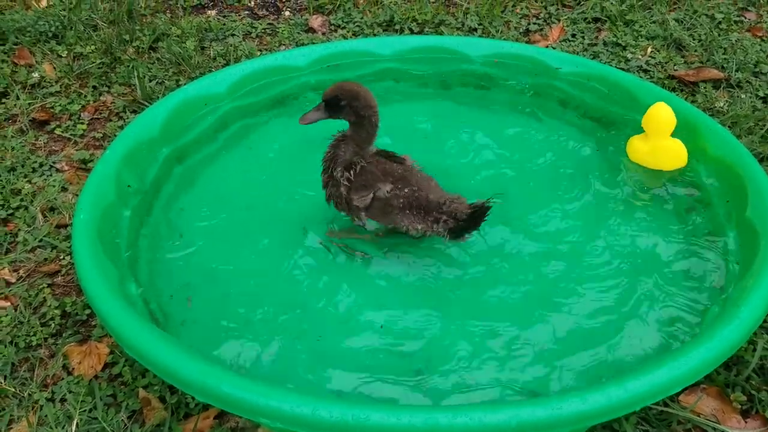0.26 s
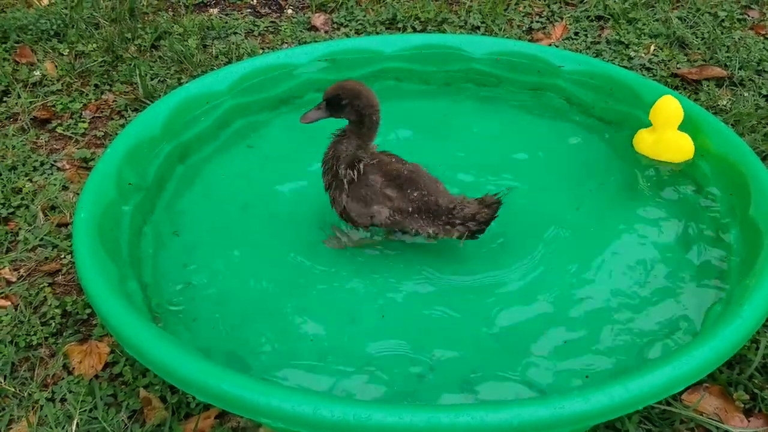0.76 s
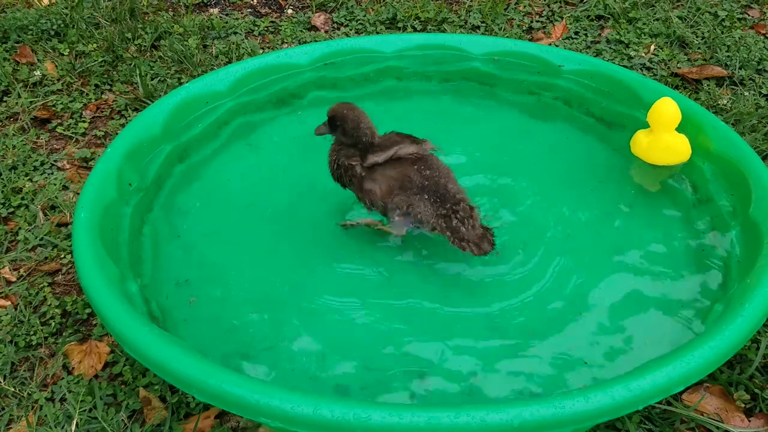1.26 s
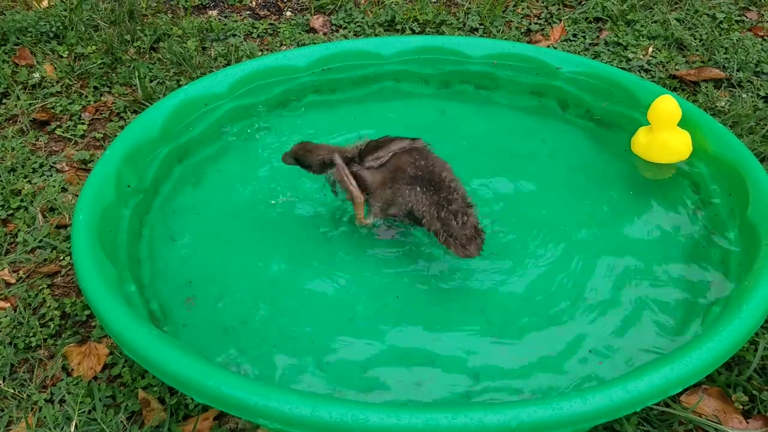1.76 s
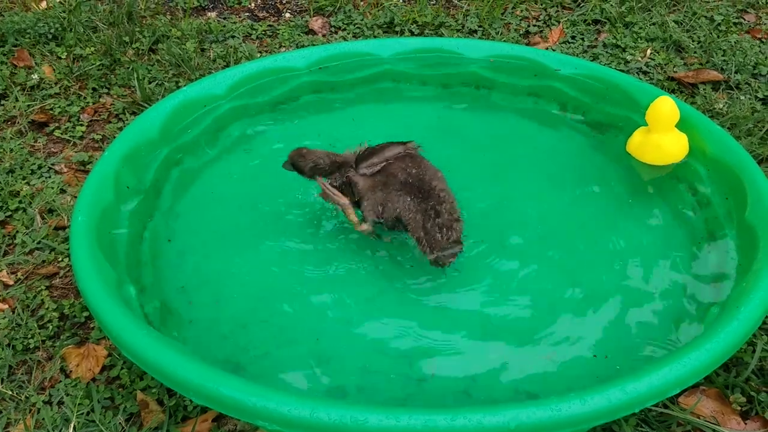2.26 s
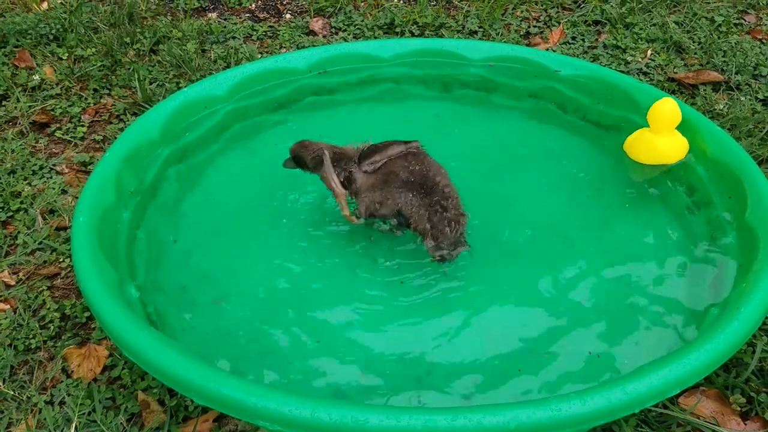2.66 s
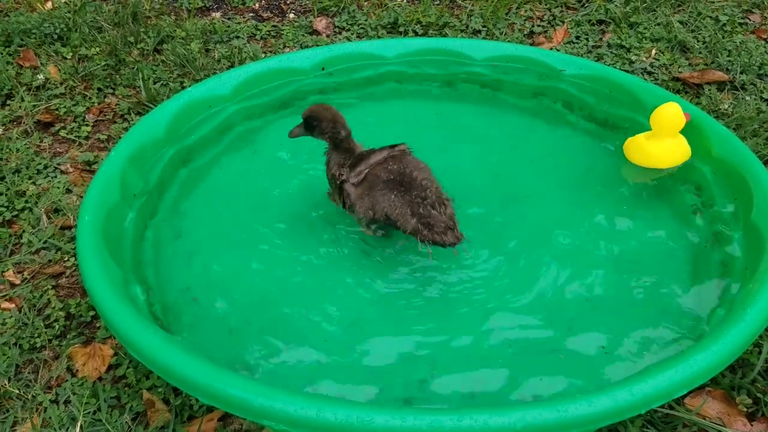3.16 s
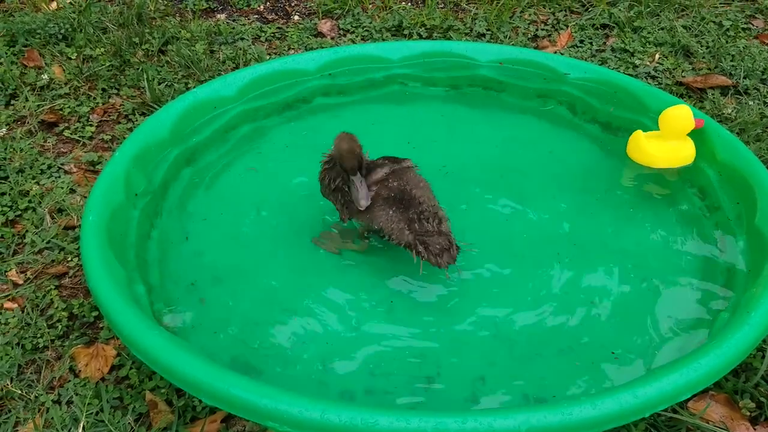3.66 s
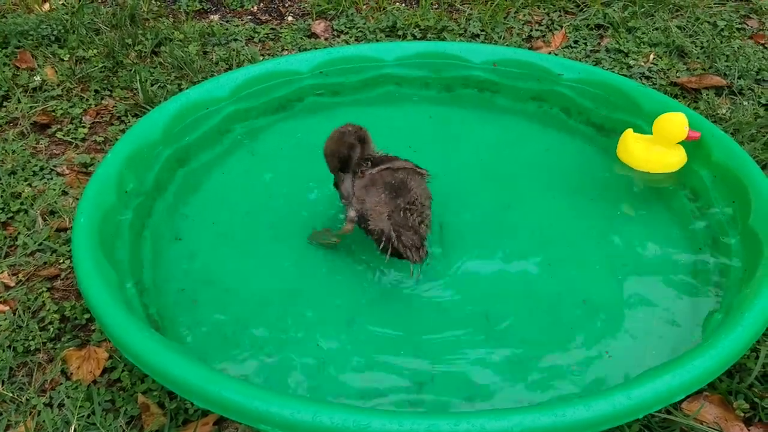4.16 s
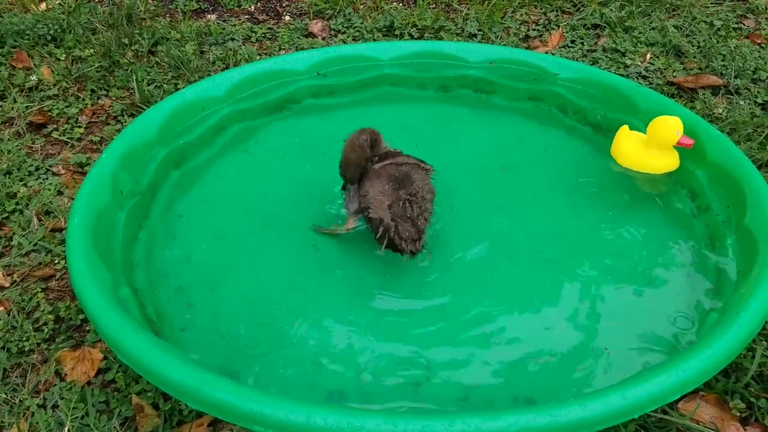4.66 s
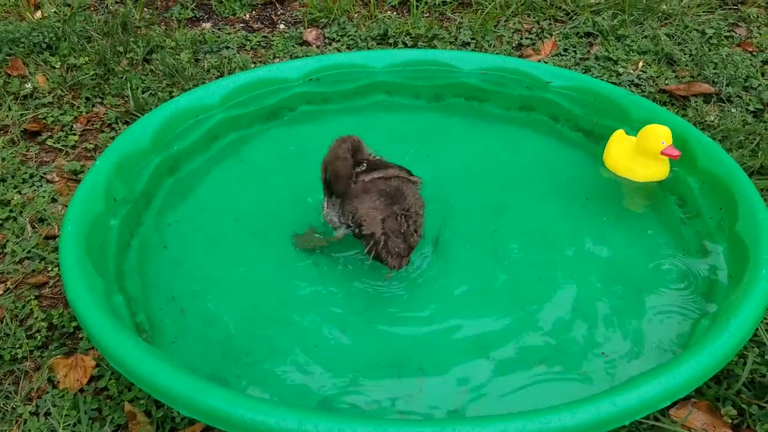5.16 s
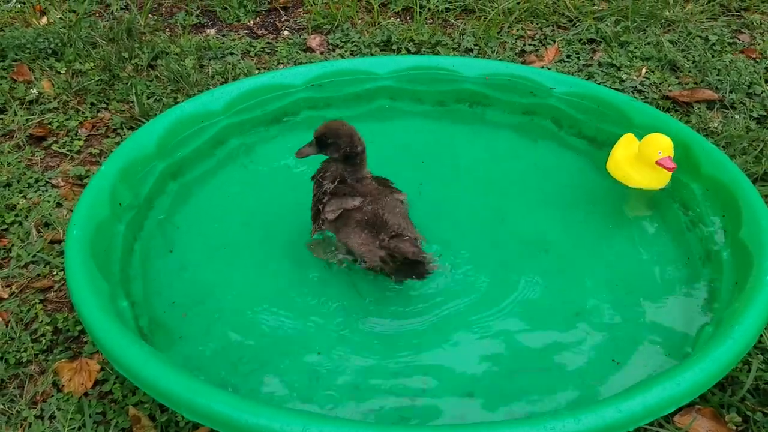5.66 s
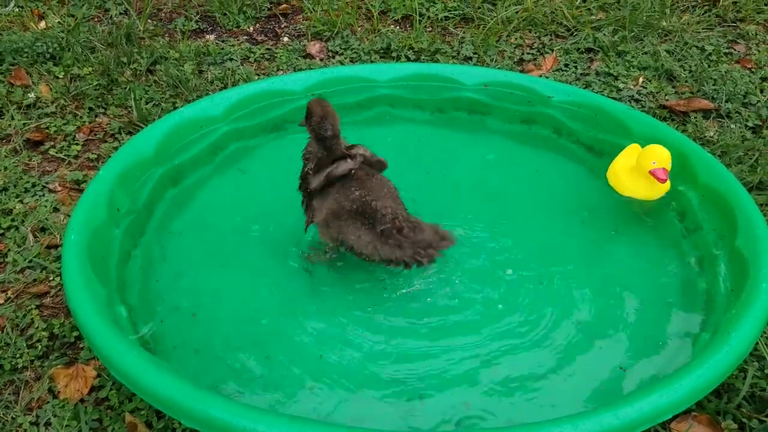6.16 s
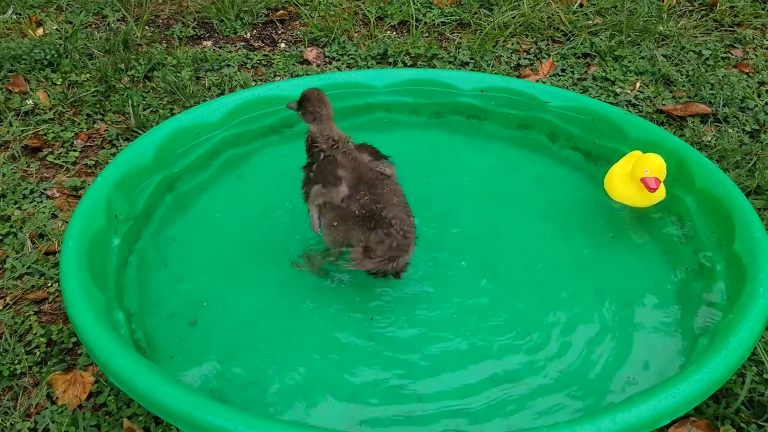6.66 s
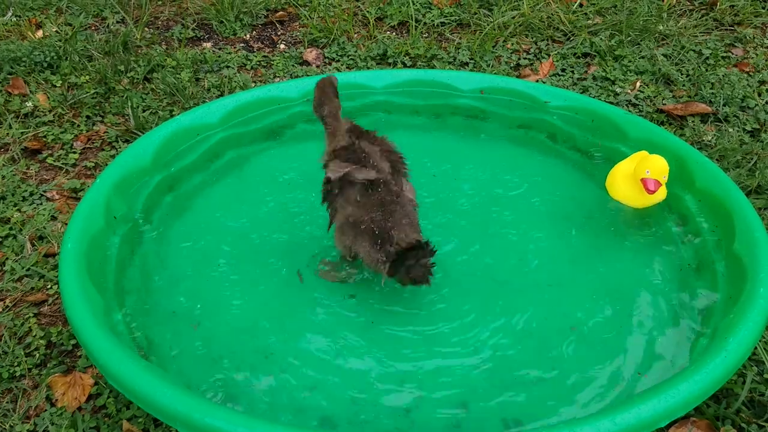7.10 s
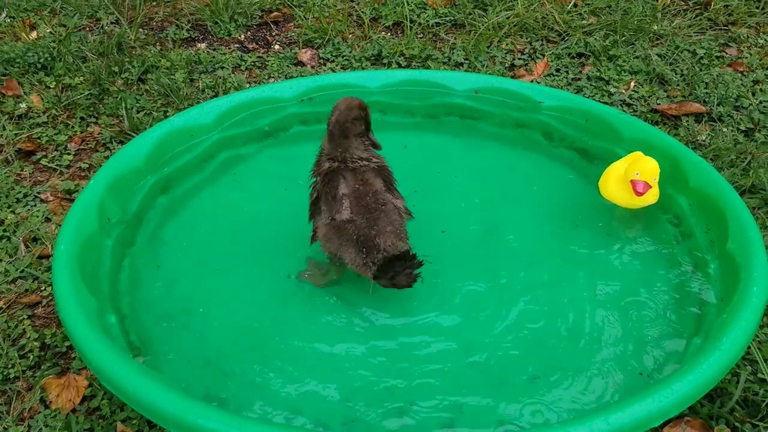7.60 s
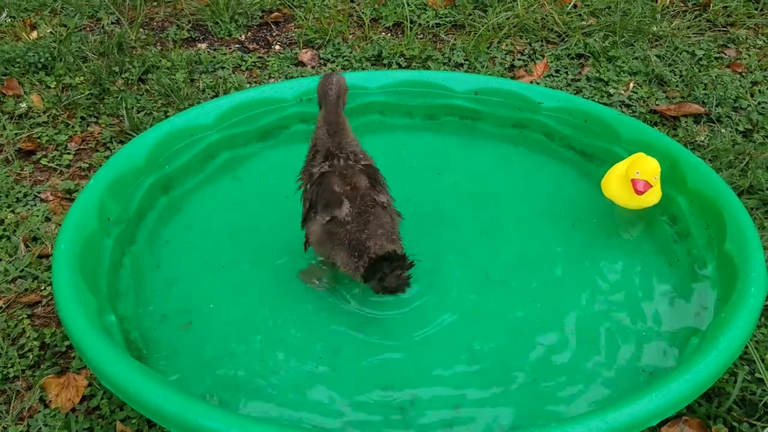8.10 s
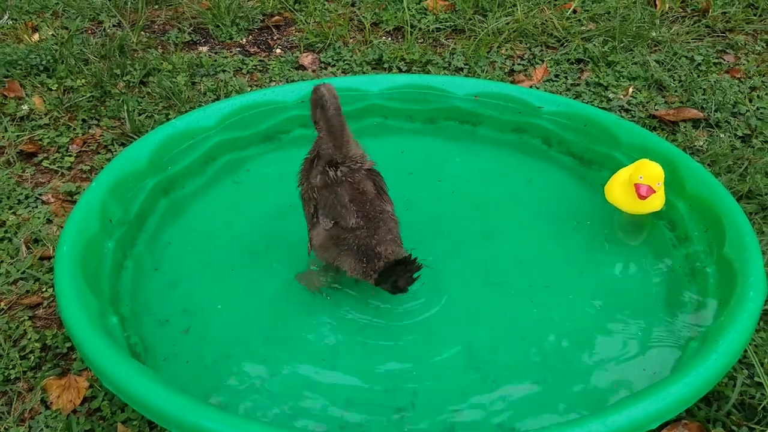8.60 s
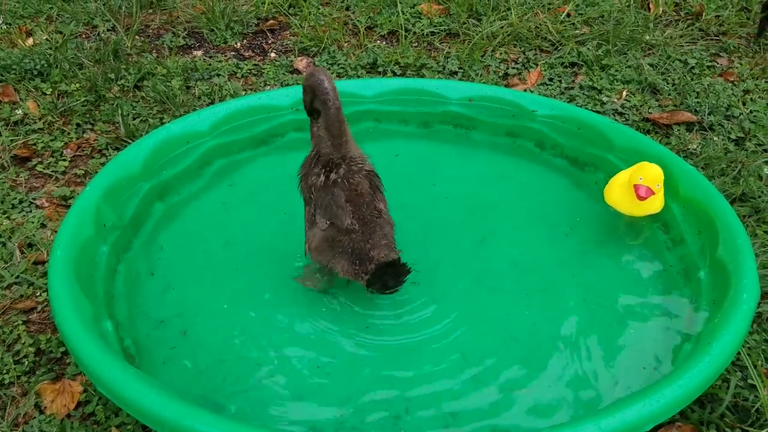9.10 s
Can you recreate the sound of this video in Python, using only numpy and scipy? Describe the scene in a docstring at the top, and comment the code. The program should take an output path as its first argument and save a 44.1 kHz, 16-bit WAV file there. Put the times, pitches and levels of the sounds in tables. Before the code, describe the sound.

Quiet outdoor air with a faint low hum, then a small plop and a busy flurry of light slaps, spray and bubbly droplets from a duckling in a wading pool. It calms to gentle lapping, scattered thin peeps, short throaty quacks and soft cooing whistles, with occasional drips to the end. The scene sits clearly on the left, dry and fairly close; dull rumble and handling thumps occupy the right.

```python
"""Peeps, soft coos and short low quacks of a young duck bathing in a shallow plastic pool on a lawn.
Peeps and coos are whistled tones; quacks are pulses and rasp ringing the throat.
Feet, bill and body slap, slosh and spray water, once with a rough plop; drops ring as bubbles.
Quiet outdoor air and a far hum lie under it.
The open left microphone port hears the scene; the muffled right one mostly rumbles and takes the hand's bumps."""
import sys
import numpy as np
from scipy import signal
from scipy.fft import rfft, irfft, next_fast_len
from scipy.io import wavfile
from scipy.ndimage import map_coordinates

SR = 44100
rng = np.random.default_rng(int(sys.argv[2]) if len(sys.argv) > 2 else 0)


def digitize_waveform(pressure):
    """Quantize a signal to 16-bit integers and store it at the path in sys.argv[1].

    Rows of a 2-D input are taken as channels; values are limited to [-1, 1].
    """
    field = np.atleast_2d(pressure).T
    bounded = np.clip(field, -1, 1)
    quanta = np.round(bounded * 32767).astype(np.int16)
    wavfile.write(sys.argv[1], SR, quanta)


N = 411889

# spectrum of water struck by foot, bill or drop: (frequency [Hz], gain [dB])
SMACK_SPECTRUM = [(300, -32), (1200, 1), (2200, 1.5), (4000, 0), (6000, -20), (12000, -36)]
# spectrum of fine spray: (frequency [Hz], gain [dB])
SPRAY_SPECTRUM = [(2000, -53), (5000, 5.5), (8000, -1.5), (10500, 1.5), (15500, 0.5)]
# strokes of foot or body: (time [s], time to die away [s], relative slosh level [dB], relative spray level [dB])
STROKE_EVENTS = [(1.315, 0.11, -71, -69), (1.388, 0.23, -65, -68), (1.445, 0.12, -81, -72),
                 (1.51, .3, -87, -72), (1.712, 0.22, -66.5, -73), (1.775, 0.052, -74, -70),
                 (1.845, 0.49, -82, -71.5), (2.11, 0.79, -75, -77), (2.495, 0.25, -66.5, -73),
                 (2.66, .3, -76, -81), (3.875, 0.28, -67, -74), (6.09, .3, -83, -76),
                 (6.19, 0.12, -78, -82), (8.26, .25, -74, -78), (9.085, 0.066, -71, -73),
                 (9.25, 0.22, -73, -75)]


def amp(db):
    """Decibels to gain."""
    return 10 ** (np.asarray(db) / 20)


def unit(x):
    """Scale to rms 1."""
    return x / np.sqrt(np.mean(x ** 2) + 1e-20)


def seconds(length_s):
    """Sample times of a sound of this length."""
    return np.arange(int(length_s * SR)) / SR


def add(track, time_s, sound):
    """Mix a sound into a track at a time, cut at the track's end."""
    start = min(max(round(time_s * SR), 0), len(track))
    track[start:start + len(sound)] += sound[:len(track) - start]


def wobble(rate_hz, size=N):
    """A smooth random curve through rate_hz random knots a second."""
    knots = rng.standard_normal(int(size * rate_hz / SR) + 4)
    return map_coordinates(knots, [np.arange(size) * rate_hz / SR])


def colour(x, points):
    """Causal minimum-phase filter with the gain of the (Hz, dB) points."""
    m = 2 * next_fast_len(len(x) // 2 + 4096)
    hz, db = np.transpose(points)
    gain = amp(np.interp(np.log(np.fft.rfftfreq(m, 1 / SR) + 1), np.log(hz), db))
    cepstrum = irfft(np.log(gain))[:m // 2]
    cepstrum[1:] *= 2  # fold to minimum phase
    return irfft(rfft(x, m) * np.exp(rfft(cepstrum, m)))[:len(x)]


def noise(points, size=N):
    """Coloured noise of rms 1."""
    return unit(colour(rng.standard_normal(size), points))


def resonate(x, hz, width_hz):
    """One resonance."""
    return signal.lfilter(*signal.iirpeak(hz, hz / width_hz, SR), x)


def bubble(hz, cycles, rise=0.041, attack_s=0.00036):
    """A trapped air bubble rings, its pitch rising at first as it nears the surface; cycles sets its decay."""
    t = seconds(min(.04, 7 * cycles / hz))
    age = t * hz / cycles  # in decay times
    ring = np.sin(2 * np.pi * hz * t * (1 + rise * np.minimum(age, 3) / 4))
    return ring * np.exp(-age) * (1 - np.exp(-t / attack_s))


def burst(points, t60_s, snap):
    """A sharp first contact and a fast-dying splatter, coloured; peak 1."""
    t = seconds(.05)
    hit = rng.standard_normal(len(t)) * amp(-60 * t / t60_s)
    hit[0] += snap
    hit = colour(hit, points)
    return hit / np.abs(hit).max()


def whistle(pitch_hz, rasp, waver=0.027, overtone_db=-22, flutter_db=2, flutter_hz=198, rasp_hz=1100):
    """One thin whistled note of rms 1 along a pitch curve; rasp 0-1 smears it into narrow noise."""
    size = len(pitch_hz)
    phase = 2 * np.pi * np.cumsum(pitch_hz * (1 + waver * wobble(500, size))) / SR
    clean = np.sin(phase) + amp(overtone_db) * np.sin(2 * phase)
    rough = wobble(rasp_hz, size) * np.sin(phase) + wobble(rasp_hz, size) * np.cos(phase)
    share = np.clip(rasp, 0, 1)
    swell = np.sqrt(np.sin(np.pi * (np.arange(size) / size) ** 0.65))
    flutter = amp(flutter_db * wobble(flutter_hz, size))
    return unit(swell * flutter * (np.sqrt(1 - share) * unit(clean) + np.sqrt(share) * unit(rough)))


def air(air_db=-55, hum_db=-58, hum_hz=124):
    """Quiet outdoor air, its level wandering, with the wavering hum of a far machine."""
    # outdoor air spectrum: (frequency [Hz], relative density [dB])
    air_spectrum = [(20, -6.5), (50, -18), (90, 0.5), (128, 0.5), (160, -2.5), (250, -7), (400, -16.5),
                    (800, -19.5), (1500, -21.5), (3000, -25.5), (5000, -37), (7500, -45), (15000, -55.5)]
    hum_phase = 2 * np.pi * np.cumsum(hum_hz + 3 * wobble(12)) / SR
    hum = np.sin(hum_phase) * amp(1.14 * wobble(5.4))
    wander_db = .7 * wobble(2.25) + 1.3 * wobble(9)
    return amp(air_db + wander_db) * noise(air_spectrum) + amp(hum_db) * unit(hum)


def rumble(level_db=-49.5, wander_db=1.33):
    """Low-heavy noise of the muffled port, its level wandering."""
    # muffled port spectrum: (frequency [Hz], relative density [dB])
    rumble_spectrum = [(15, 1), (50, 1.5), (90, -8), (125, -16), (170, -22), (400, -29.5), (800, -32),
                       (1500, -34.5), (3000, -38), (5000, -43), (9000, -52.5), (15000, -73.5)]
    return amp(level_db + wander_db * wobble(5.5)) * noise(rumble_spectrum)


def crackle(rate_hz, spread_db):
    """Tiny impacts of uneven size and random sign at random times."""
    sizes = amp(spread_db * np.minimum(rng.exponential(size=N), 3))
    return (rng.random(N) < rate_hz / SR) * rng.choice([-1, 1], N) * sizes


def froth(low_hz, high_hz, cycles, spread_db, count):
    """A steady swarm of bubbles of random pitch and size, rms 1."""
    out = np.zeros(N)
    for when, pitch, size in rng.random((count, 3)):
        hz = low_hz * (high_hz / low_hz) ** pitch
        add(out, when * N / SR, amp(spread_db * size) * bubble(hz, cycles))
    return unit(out)


def stirring(rise_s=.014, fade_db=29.5):
    """Gains of slosh and of spray: every stroke swells quickly, then loses fade_db over its time to die away."""
    slosh, spray = np.zeros(N), np.zeros(N)
    for time_s, length_s, slosh_db, spray_db in STROKE_EVENTS:
        t = seconds(2 * length_s) - rise_s
        shape = np.minimum(1 + t / rise_s, amp(-fade_db * t / length_s))
        add(slosh, time_s - rise_s, amp(slosh_db) * shape)
        add(spray, time_s - rise_s, amp(spray_db) * shape)
    return slosh, spray


def churn(slosh_db=0, bubbles_db=4, mist_db=1, ticks_db=-2, lapping_db=-1):
    """Stirred water: crackling slosh with small bubbles, spray with ticking droplets, and lapping ripples."""
    # slosh spectrum: (frequency [Hz], gain [dB])
    slosh_spectrum = [(120, -6), (300, -2.5), (900, -11.5), (1700, 2), (3500, 4.5), (5500, -10),
                      (9000, -29.5)]
    # ripples that keep lapping: (time [s], level before lapping_db [dB])
    ripple_curve = [(0.0, -69), (0.75, -73.5), (1.4, -68), (4.58, -67), (5.12, -64), (5.72, -69),
                    (6.19, -64.5), (7.46, -71), (7.75, -66), (9.34, -68.5)]
    slosh = amp(slosh_db) * unit(colour(crackle(1500, 1.8), slosh_spectrum))
    slosh += amp(bubbles_db) * froth(1188, 5450, 4.8, 18, count=3000)
    spray = amp(mist_db) * unit(colour(crackle(900, 2.5), SPRAY_SPECTRUM))
    spray += amp(ticks_db) * froth(8870, 16400, 4.8, 22, count=1600)
    slosh_gain, spray_gain = stirring()
    ripple_gain = amp(lapping_db + np.interp(np.arange(N) / SR, *np.transpose(ripple_curve)))
    ripples = ripple_gain * (unit(slosh) + amp(-10.0) * unit(spray))
    return slosh_gain * slosh + spray_gain * spray + ripples


def bumps(ring_hz=62, damping=0.46, gain_db=2):
    """Each push of the hand squeezes the air at the port; the microphone's bass cut rings after it."""
    # hand pushes: (time [s], level before the bass cut and gain_db [dB], Gaussian width [s])
    bump_events = [(0.371, -20, 0.0016), (.386, -24.5, 0.0024), (3.9417, -20, 0.0017), (4.712, -26, 0.0018),
                   (4.773, -25.5, 0.0018), (4.899, -26, 0.0021), (4.992, -33.5, 0.0015),
                   (6.7108, -25.5, 0.0013), (6.7852, -25, 0.0017), (7.468, -32.5, 0.0022),
                   (7.855, -26.5, 0.0053), (8.288, -32.5, 0.0053), (9.166, -33, 0.0023)]
    push, t = np.zeros(N), seconds(.04) - .02
    for time_s, db, width_s in bump_events:
        add(push, time_s - width_s + t[0], amp(db) * np.exp(-.5 * (t / width_s) ** 2))
    w = 2 * np.pi * ring_hz
    bass_cut = signal.bilinear([1, 0, 0], [1, damping * w, w * w], SR)
    return amp(gain_db) * signal.lfilter(*bass_cut, push)


def peeps_and_plop(scoop=1.42):
    """Whistled peeps glide through their middle pitch; the fully rasping one at 1.037 s is a rough plop of water."""
    # peeps and the plop: (time [s], length [s], middle pitch [Hz], glide [octaves], rms level [dB], rasp [0-1])
    note_events = [(1.037, 0.015, 1900, 0.4, -50.5, 1), (1.182, 0.05, 2640, -0.13, -61, .1),
                   (1.258, 0.042, 2170, .7, -62.5, 0.4), (1.32, .022, 2590, 1.1, -55.5, 0.3),
                   (2.944, .026, 1650, .7, -61, 0.4), (3.025, 0.091, 2335, -0.26, -62, .1),
                   (3.092, .052, 2040, .2, -56.5, 0), (3.177, .038, 1720, .45, -57.5, .1),
                   (3.196, .032, 2800, .7, -59, .3), (3.917, .045, 1770, 0.53, -56, 0.3),
                   (4.068, 0.019, 1994, 0.69, -49.5, 0.3), (4.397, 0.11, 1030, 0.45, -61, 0.64),
                   (5.014, 0.024, 1645, 0.9, -56.5, 0.64), (5.199, 0.032, 1755, 0.77, -57, 0.7),
                   (5.388, 0.029, 1554, .9, -55.5, .6), (5.533, 0.03, 1980, 1.55, -59.5, .35),
                   (5.847, .026, 1542, 0.34, -52, 0.02), (6.873, 0.052, 1422, 0.17, -62.5, 0.4),
                   (7.072, .024, 2000, .26, -61, 0.3), (7.656, 0.025, 1945, 0.15, -57.5, .7),
                   (7.782, .047, 2670, .2, -65.5, .2), (7.875, 0.015, 2310, .5, -59, .2),
                   (8.317, .014, 1920, 0.93, -56.5, 0.3), (8.398, .017, 2230, 0.61, -61.5, 0),
                   (8.575, 0.028, 2080, 0.61, -50.5, 0.15), (8.699, 0.011, 1915, 0.23, -47.5, 0)]
    out = np.zeros(N)
    for time_s, length_s, hz, octaves, db, rasp in note_events:
        u = seconds(length_s) / length_s
        pitch_hz = hz * 2 ** (octaves * (u ** scoop - .5 ** scoop))  # starts level, then steepens
        add(out, time_s, amp(db) * whistle(pitch_hz, rasp))
    return out


def droplets(gain_db=12, spread_db=10, low_hz=1400, high_hz=5800, cycles=6, scatter=.45, count=14):
    """Each stroke throws up small droplets; they patter back while it dies away."""
    out = np.zeros(N)
    for time_s, length_s, slosh_db, _ in STROKE_EVENTS:
        for when, pitch, size in rng.random((count, 3)):
            plink = bubble(low_hz * (high_hz / low_hz) ** pitch, cycles)
            gain = amp(slosh_db + gain_db - spread_db * size)
            add(out, time_s + scatter * length_s * when, gain * plink)
    return out


def drops(bubble_db=3, tick_db=-3, median_cycles=9):
    """Single larger drops tick on the surface and plink as bubbles."""
    # drops that trap a bubble: (time [s], level before bubble_db or tick_db [dB], bubble pitch [Hz])
    drop_events = [(1.3219, -48, 1430), (1.3914, -57, 3240), (1.3987, -48, 2430), (1.4254, -58, 1440),
                   (1.4571, -50, 1360), (1.4684, -59, 1960), (1.49, -44, 3160), (1.5778, -46, 3700),
                   (1.7274, -55, 4470), (1.764, -45.5, 4480), (1.7828, -54, 1480), (1.842, -49, 3780),
                   (1.8474, -50, 1360), (1.8548, -48.5, 2560), (1.9814, -53, 1960), (2.0807, -49, 2150),
                   (2.1167, -42.5, 3810), (2.4892, -51, 2130), (2.5174, -57, 3300), (5.884, -49, 3930),
                   (6.0043, -51, 2850), (6.1095, -51, 3200), (6.1993, -52, 3240), (9.0902, -44.5, 3700),
                   (9.246, -50, 3670), (9.3074, -46, 3080)]
    out = np.zeros(N)
    log_lives = rng.normal(0, 0.2, len(drop_events))
    for (time_s, db, hz), log_life in zip(drop_events, log_lives):
        add(out, time_s, amp(db + bubble_db) * bubble(hz, median_cycles * np.exp(log_life)))
        add(out, time_s, amp(db + tick_db) * burst(SMACK_SPECTRUM, t60_s=0.02, snap=4))
    return out


def slaps(body_db=3, spray_db=10):
    """Foot and bill hit the water: a short smack and a burst of fine spray."""
    # slaps: (time [s], smack peak before body_db [dB], spray peak before spray_db [dB])
    slap_events = [(1.3778, -58, -57), (1.3986, -41, -47), (1.4406, -56, -52), (1.449, -49, -46),
                   (1.4575, -40, -45), (1.514, -58, -61), (1.6166, -44, -72), (1.707, -55, -40.5),
                   (1.766, -46, -53), (1.7784, -59, -51), (2.0368, -51, -56.5), (2.108, -38, -56),
                   (2.1241, -52, -52), (2.3037, -62, -56), (2.4892, -48, -69), (2.6589, -46, -73),
                   (2.772, -51, -57), (3.6674, -46, -75), (4.2086, -49, -58), (4.912, -48, -55),
                   (5.089, -53, -56), (5.114, -48, -71), (6.0791, -51, -56), (6.9109, -37.5, -62),
                   (7.3196, -51, -59), (8.304, -43, -73), (8.7425, -62, -54.5)]
    out = np.zeros(N)
    for time_s, smack_db, fizz_db in slap_events:
        add(out, time_s, amp(smack_db + body_db) * burst(SMACK_SPECTRUM, t60_s=0.03, snap=11.5))
        add(out, time_s, amp(fizz_db + spray_db) * burst(SPRAY_SPECTRUM, t60_s=0.035, snap=6.9))
    return out


def coos(fall_s=.03, fall_octaves=0.39, rasp=0.02):
    """Soft whistled coos follow one arch of pitch; the short ones sound only its falling end."""
    # coos: (time [s], length [s], top pitch of the arch [Hz], rms level [dB])
    coo_events = [(1.478, 0.023, 853, -55), (1.614, 0.059, 868, -55), (3.05, 0.013, 810, -58),
                  (6.286, 0.031, 860, -56.5), (6.423, 0.062, 915, -57), (6.83, 0.061, 856, -67),
                  (6.91, 0.0297, 914, -63), (7.375, 0.029, 876, -59), (7.522, 0.058, 863, -53.5),
                  (7.587, 0.065, 945, -54.5)]
    out = np.zeros(N)
    for time_s, length_s, top_hz, db in coo_events:
        past_top = (seconds(length_s) - length_s) / fall_s + 1
        pitch_hz = top_hz * 2 ** (-fall_octaves * past_top ** 2)
        add(out, time_s, amp(db) * whistle(pitch_hz, rasp))
    return out


def quacks(sag=.11, jitter=.012, onset_rasp=1.0, fundamental_db=-5):
    """Each quack starts as a rasp and settles toward pulses that ring the throat; an open bill adds high resonance."""
    # quacks: (time [s], length [s], middle pitch [Hz], rms level [dB], hoarseness [0-1], bill re throat [dB])
    quack_events = [(1.629, 0.029, 296, -47, 0.2, -33), (3.51, 0.062, 257, -56.5, 0, -14),
                    (3.683, 0.052, 240, -59.5, 0.94, -22), (3.822, 0.031, 204.7, -52, 0.9, -23),
                    (3.863, 0.081, 194, -50.5, 0.52, -17), (4.41, .07, 235, -58.5, 0.64, -30),
                    (5.121, .056, 208.2, -40, 0.03, -28), (5.433, 0.054, 210.2, -40.5, 0.19, -31),
                    (7.722, 0.049, 219.3, -55.5, 0.4, -13.5), (8.024, 0.045, 211.6, -44.5, 0.47, -5)]
    # throat resonances: (frequency [Hz], width [Hz], level [dB])
    throat_modes = [(230, 92, 8.5), (594, 255, 5), (940, 190, -21), (1040, 78, 4.5), (1200, 130, 5.5),
                    (1420, 166, 7.5), (1660, 160, -14), (2110, 450, -18), (2980, 680, -3.5)]
    # soft tissue dulls the voice: (frequency [Hz], gain [dB])
    tissue_curve = [(80, -4.5), (200, 0), (300, 9), (420, -1.5), (560, 0), (1600, -4.5), (2200, -10.5),
                    (3200, -14.5), (6000, -40)]
    out = np.zeros(N)
    for time_s, length_s, pitch_hz, db, hoarse, bill_db in quack_events:
        u = seconds(length_s) / length_s
        cycles = np.cumsum(pitch_hz * (1 + sag * (.5 - u) + jitter * wobble(200, len(u)))) / SR
        pulses = unit(np.diff(np.floor(cycles), prepend=0) * amp(wobble(178, len(u))))
        rasp = unit(rng.standard_normal(len(u)) * np.exp(-2.5 * (cycles % 1)))  # dies within each cycle
        share = np.clip(hoarse + onset_rasp * np.exp(-8 * u), 0, 1)
        source = np.sqrt(1 - share) * pulses + np.sqrt(share) * rasp
        source = source * np.sin(np.pi * u) ** 0.5
        source = np.pad(source, (0, SR // 100))  # room to ring on
        modes = sum(amp(level_db) * resonate(source, hz, width_hz) for hz, width_hz, level_db in throat_modes)
        throat = colour(modes, tissue_curve)
        bill = resonate(resonate(source, 3580, 470), 2700, 960)
        fundamental = np.zeros(len(source))
        add(fundamental, 0, np.cos(2 * np.pi * cycles) * np.sin(np.pi * u))
        voice = unit(throat) + amp(bill_db) * unit(bill) + amp(fundamental_db) * unit(fundamental)
        add(out, time_s, amp(db) * unit(voice))
    return out


def yard(x, t60_s=0.15):
    """A faint, short answer from the pool wall and the yard: convolution with a decaying noise tail."""
    t = seconds(.3)
    tail = noise([(200, 13.0), (2000, 5), (12000, -14.0)], len(t))
    tail = tail * amp(-60 * t / t60_s) * (t > .003)
    return signal.fftconvolve(x, tail / np.linalg.norm(tail))[:N]


def scene():
    """The duck and its water reach the open left port; the right one mostly rumbles."""
    bath = churn() + peeps_and_plop() + droplets() + drops() + slaps() + coos() + quacks()
    left = bath + amp(-18.5) * yard(bath) + air()
    right = amp(-60.0) * bath + amp(-34.5) * yard(bath) + rumble() + bumps()
    return np.array([left, right])


def record(dry, top_hz=15850):
    """Each channel adds its own hiss; nothing passes at or above top_hz."""
    # hiss spectrum: (frequency [Hz], relative density [dB])
    hiss_spectrum = [(1000, -7), (6000, -4.5), (10000, -5), (13000, -2.5), (15500, 1)]
    hiss = np.array([amp(-70.5) * noise(hiss_spectrum), amp(-71.5) * noise(hiss_spectrum)])
    passed = np.fft.rfftfreq(N, 1 / SR) < top_hz
    return irfft(rfft(dry + hiss) * passed, N)


dry = scene()
out = record(dry)
digitize_waveform(out)
```